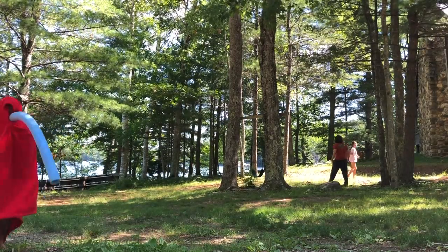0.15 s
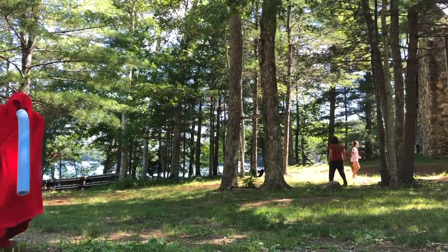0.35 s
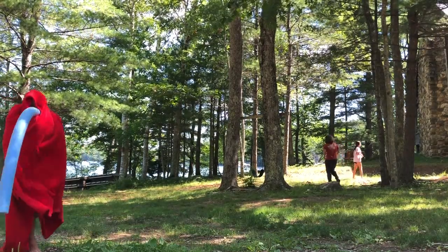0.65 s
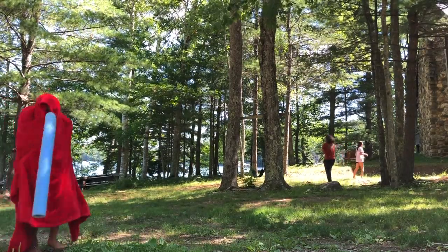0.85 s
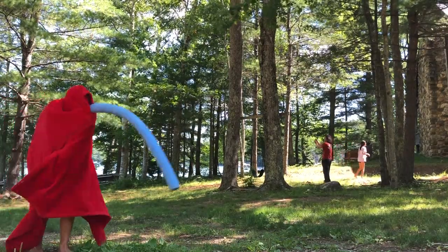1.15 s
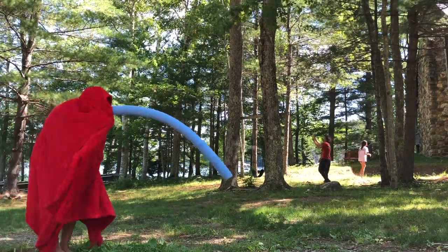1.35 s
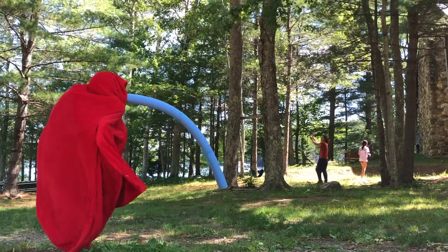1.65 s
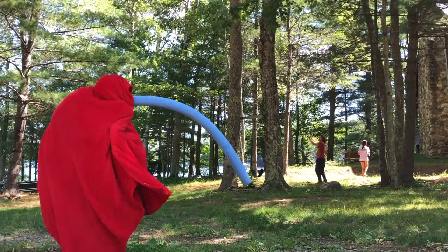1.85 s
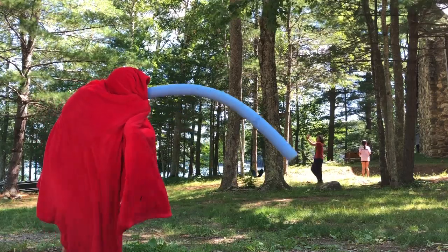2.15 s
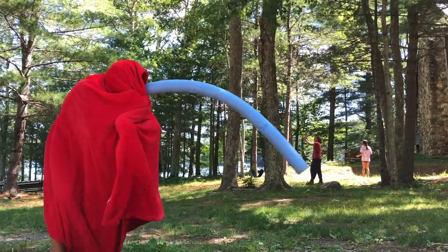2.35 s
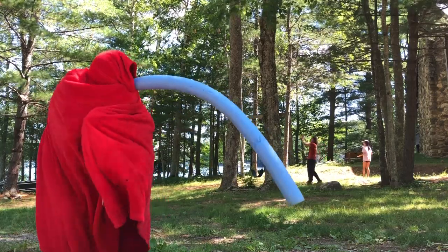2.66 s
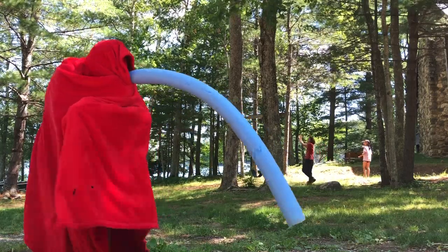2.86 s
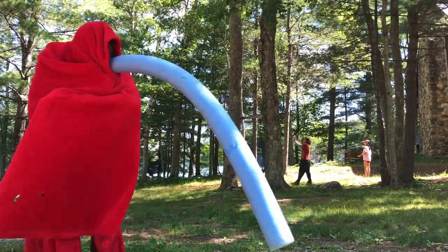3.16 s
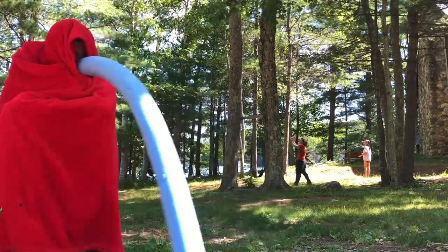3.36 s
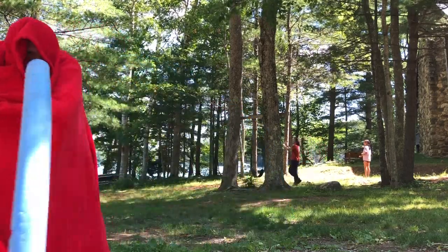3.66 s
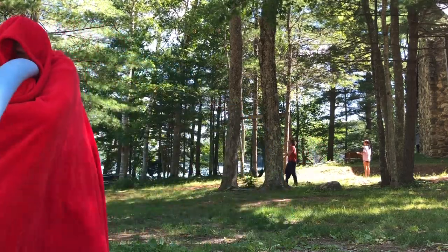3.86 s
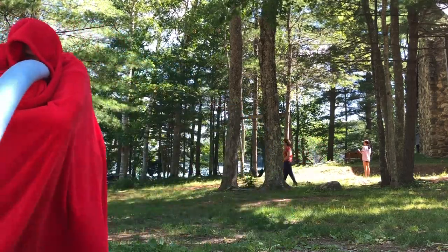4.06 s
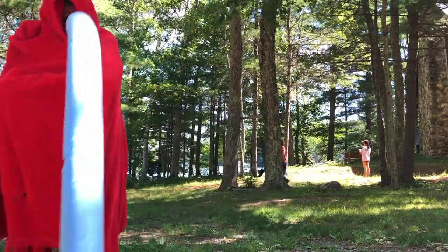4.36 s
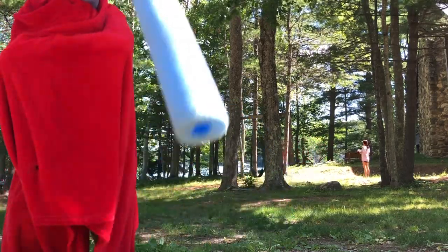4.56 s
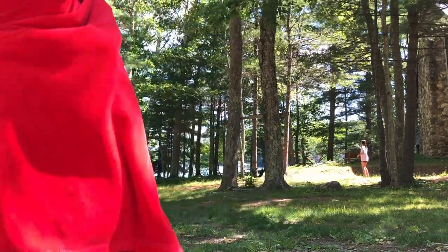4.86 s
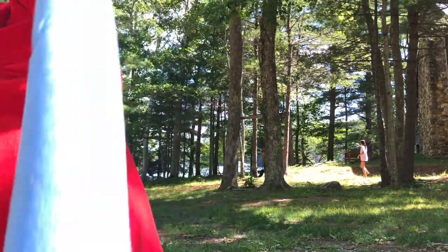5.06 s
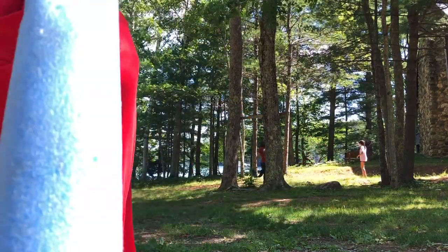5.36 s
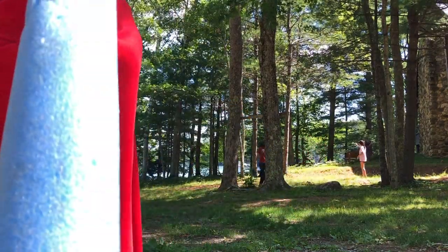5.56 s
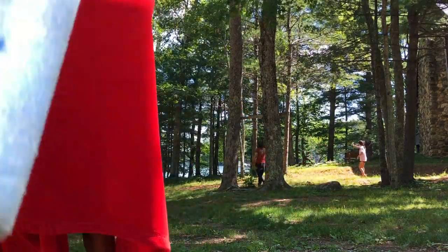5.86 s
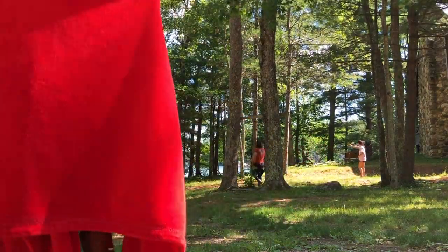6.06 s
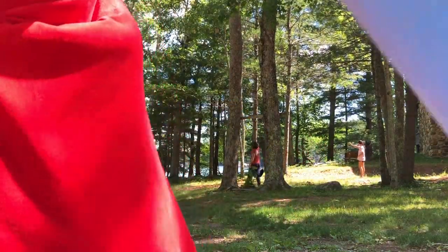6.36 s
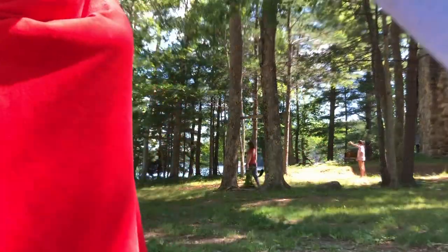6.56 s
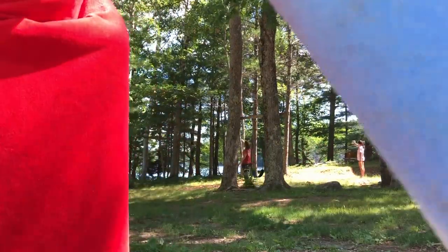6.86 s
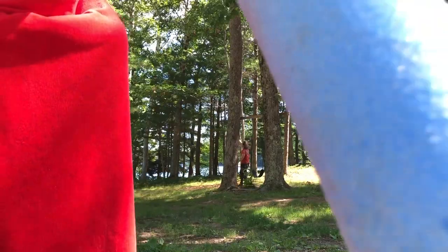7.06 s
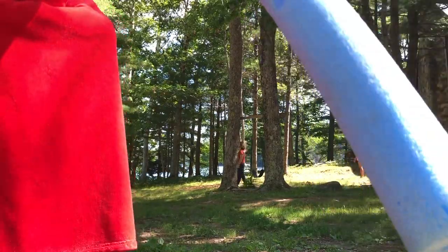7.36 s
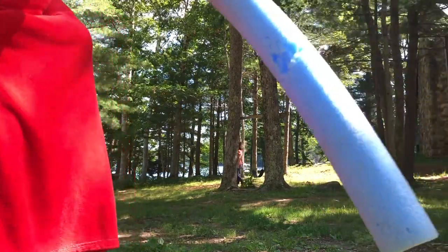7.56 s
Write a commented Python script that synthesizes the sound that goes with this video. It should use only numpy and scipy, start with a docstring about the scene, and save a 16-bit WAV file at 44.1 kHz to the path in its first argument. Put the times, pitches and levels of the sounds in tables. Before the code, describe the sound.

Wind puffs and one strong gust buffet a microphone in quiet woods, then cloth rustles and a foam tube thumps and scrapes against it.

```python
"""Wind turbulence on a phone's microphone: a frozen pattern of noise swept past faster in stronger air, with eddies.
Leaves hiss as broadband noise beneath it, and far motor hums are wavering sines.
A blanket rustles and ticks by fine friction grains; a foot drags in grass, twigs snap, an insect buzzes faintly.
A foam tube bumps the phone (thuds falling in pitch), scuffs it and drags along it (stick-slip noise)."""
import sys
import numpy as np
from scipy import signal
from scipy.fft import rfft, irfft
from scipy.io import wavfile
from scipy.ndimage import uniform_filter1d, map_coordinates

SR = 44100
rng = np.random.default_rng(int(sys.argv[2]) if len(sys.argv) > 2 else 0)


def wav_record(signal):
    """Record a signal, one row per channel, as 16-bit PCM in the file named by sys.argv[1]."""
    frames = np.transpose(np.atleast_2d(signal))
    bounded = np.clip(frames, -1, 1)
    # unit amplitude maps onto the largest positive 16-bit level
    quanta = np.round(bounded * 32767).astype(np.int16)
    wavfile.write(sys.argv[1], SR, quanta)


N = 340011
T = np.arange(N) / SR  # time in seconds

# Background breeze on the microphone, rising, falling and lulling.
# Each row: time in seconds, level in dB before flutter.
BREEZE = [(0, -64), (1.0, -64), (1.45, -59), (1.8, -53), (2.73, -55), (2.76, -70), (2.95, -61.5),
          (3.17, -75), (3.34, -75), (3.45, -60), (3.9, -68), (4.6, -60.5), (5.6, -55.5), (5.87, -68),
          (6.38, -66.5), (6.72, -55), (6.95, -60), (7.71, -61)]
# The one strong gust, added to the breeze. Each row: time in seconds, level in dB before flutter.
STRONG_GUST = [(1.8, -56), (1.84, -45), (1.895, -42), (1.938, -25), (1.975, -35), (2.066, -36),
               (2.122, -28), (2.2, -32), (2.25, -31), (2.3, -41), (2.38, -50), (2.42, -65.5)]
# Short puffs of air. Each row: start in seconds, length in seconds, level in dB before flutter.
PUFFS = [(0.049, 0.12, -47), (.35, 0.23, -47), (0.646, 0.031, -55), (0.753, 0.041, -48), (.85, 0.041, -41),
         (0.946, 0.028, -52), (1.09, 0.071, -53), (1.262, .04, -52), (1.338, 0.061, -43), (2.389, .04, -43),
         (2.451, .09, -43), (2.579, 0.12, -41.5), (2.996, .13, -48), (3.376, 0.068, -53), (3.529, .21, -44),
         (3.781, 0.0315, -52), (4.244, 0.066, -56), (4.558, 0.027, -53), (4.78, 0.067, -53),
         (5.888, 0.033, -54), (6.07, 0.058, -52.5)]
# Sudden eddies in the wind. Each row: time in seconds, envelope peak in dB, settled pitch in Hz.
EDDIES = [(0.097, -39.5, 252), (0.877, -41.5, 248), (1.361, -39, 253.5), (1.906, -30, 310),
          (1.933, -19.5, 563), (1.953, -29, 243.1), (2.015, -27, 256), (2.064, -38, 330), (2.097, -26, 380),
          (2.121, -22, 342), (2.158, -33, 362), (2.174, -29.5, 364.7), (2.194, -33.5, 299),
          (2.231, -28, 404), (2.243, -24.5, 317.5), (2.354, -41, 328), (2.403, -39.5, 249.6),
          (2.52, -38.5, 310.3), (2.611, -37.5, 311), (3.65, -44, 248.4), (3.704, -40, 257)]
# Spectrum of the turbulence pattern at unit speed. Each row: frequency in Hz, relative density in dB per Hz.
TURBULENCE = [(15, -29), (45, -7.5), (90, -3.5), (150, -4.5), (250, -11.5), (400, -25), (700, -52.5),
              (1200, -95)]
PUFF_RISE_S, PUFF_FALL_S, PUFF_GROWS_DB = .03, .012, 3  # a puff builds up, then breaks off
WAKE_DB = -5.5  # turbulence behind an eddy, relative to the eddy

# Spectrum of the leaf hiss. Each row: frequency in Hz, relative density in dB per Hz.
LEAF_SPECTRUM = [(24, -48), (40, -6), (69, -2.5), (154, -4), (208, -7.5), (267, -7.5), (474, -16),
                 (862, -16), (1960, -27), (4260, -24), (15600, -38)]
LEAVES_DB = -61.5  # mean rms level of the hiss above 500 Hz
# Far motor tones. Each row: start in seconds, end in seconds, mean pitch in Hz, mean rms level in dB.
MOTOR_TONES = [(4.4, 5.801, 81.86, -64), (6.901, 7.71, 82, -67), (4.0, 5.743, 146.1, -57),
               (5.15, 5.81, 178.3, -56), (6.7, 7.71, 146.6, -59.5), (7.38, 7.67, 177.7, -58)]
HUM_FADE_S = 0.084

# Blanket swishes. Each row: start in seconds, length in seconds, level in dB, brightness in dB per octave.
RUSTLE = [(.96, .11, -69, 7), (1.49, 0.039, -60.5, 1), (2.861, 0.042, -65, 8), (3.02, 0.48, -70.5, 0),
          (3.748, 0.14, -66.5, 6), (3.885, 0.083, -57.5, 5), (4.024, .05, -65, 5), (4.539, .22, -55, 3),
          (4.639, 0.096, -55, -2), (4.782, 0.097, -63.5, 0), (4.915, 0.083, -57.5, 5),
          (6.158, 0.044, -64.5, -2), (7.584, 0.065, -64.5, -1)]
# Blanket ticks. Each row: time in seconds, rms in dB before decay, brightness in dB per octave.
TICKS = [(1.409, -50.5, 5), (2.354, -45, 5), (3.0163, -51, 6), (3.1386, -37, 6.5), (3.1514, -47, 6),
         (3.2844, -49, -2), (3.296, -54.5, 3), (3.481, -46, 3), (4.608, -34, 5), (4.7454, -49, 2),
         (4.9807, -47.5, 0.5), (5.6016, -40, -6.5), (6.905, -38, 11)]
SWISH_RISE_S, SWISH_FALL_S = 0.039, 0.018

# A foot drags in dry grass. Each row: time in seconds, level in dB before flicker.
GRASS = [(2.85, -79), (2.9, -66), (2.942, -49.5), (3.02, -65)]
# Twigs snap underfoot. Each row: time in seconds, rms in dB before the envelope.
TWIGS = [(3.13, -38), (3.181, -48.5), (3.274, -34)]
# Far insect. Each row: start in seconds, end in seconds, upper edge of the buzz in Hz, level in dB before fades.
INSECT = [(3.027, 3.359, 7520, -74.5), (5.197, 5.496, 7740, -78)]

# Tube bumps the phone. Each row: time in seconds, amplitude in dB before the envelope, first pitch in Hz,
# time constant of the pitch fall in ms, decay time in ms.
BUMPS = [(5.0738, -19.5, 234, 29, 7.9), (5.133, -20.5, 201.6, 21, 35), (5.175, -25.5, 90, 37, 24),
         (6.4202, -24, 535, 11, 7.1), (6.424, -26, 238, 14.3, 20), (6.449, -31, 75.5, 110, 19),
         (6.604, -36, 500, 5.2, 6.3), (6.609, -31, 136.5, 36, 22)]
# Tube scuffs the phone. Each row: time in seconds, rms in dB before the envelope, length in ms,
# brightness in dB per octave, ring of the squeezed foam in Hz.
SCUFFS = [(5.071, -31.5, 4.2, -0.5, 3800), (5.089, -37, 15, 1, 4000), (5.1318, -29.5, 3.1, -0.5, 2500),
          (5.144, -35, 19.4, 0, 4400), (5.172, -36.5, 8.4, -2.5, 2700), (6.4192, -22, 3, 1.5, 4300),
          (6.435, -31.5, 3.8, 2.5, 4460), (6.442, -39.5, 9.3, -4.5, 2300), (6.53, -51.5, 30, 1.5, 4530),
          (6.599, -28.5, 5.6, 0, 3230), (6.618, -50, 6.9, 5, 3500), (6.634, -39.5, 11.2, 0, 2500),
          (6.692, -31, 10.8, 0, 3300), (6.705, -36.5, 18.3, -2.5, 3330), (6.733, -46.5, 12.4, 0, 2800),
          (6.764, -35.5, 10.4, -2, 4000), (6.82, -39.5, 40.6, -2, 3300), (6.980, -30.5, 2, -1.5, 3220),
          (7.081, -33.5, 2.6, -4, 2600), (7.25, -31, 5.6, -2, 3800), (7.347, -31.5, 4.2, -2.5, 3800)]
# Tube drags along the phone. Each row: time in seconds, level in dB before the rush is added,
# mean brightness in dB per octave.
DRAG = [(6.76, -66, 4), (6.768, -41.5, 0), (6.86, -47.5, -8), (6.925, -53.5, -7), (6.975, -40, -4.5),
        (7.08, -44, -0.5), (7.12, -40, 0.5), (7.354, -41, 4), (7.375, -44, 1.5), (7.395, -60, -4)]
# Spectrum of the long drag. Each row: frequency in Hz, relative density in dB per Hz.
DRAG_SPECTRUM = [(120, -47.5), (200, -11), (407, -16), (480, -1.5), (642, -7), (1260, 4), (2570, -2),
                 (3830, 7), (7520, -6.5), (15600, -18)]
# Spectrum of short scuffs. Each row: frequency in Hz, relative density in dB per Hz.
SCUFF_SPECTRUM = [(240, -15), (400, 1), (643, -4), (1260, 1), (2190, -8), (2800, -2), (4370, -4),
                  (5020, -4), (6030, -4.5), (15600, -12)]
# Resonances of the phone case. Each row: frequency in Hz, width in Hz, gain in dB.
CASE_RINGS = [(479.3, 32, 4), (1236, 170, 8), (3920, 700, 1.5), (7200, 1900, -0.5)]
SCUFF_RISE, SCUFF_FALL = 0.51, 0.23  # shares of the scuff length
RUSH_DB, RUSH_PER_BRIGHTNESS = -3, 1.62  # airy rush of the drag: base level, dB per unit of brightness
# The foam creeps on after a quick tap, less after a long scuff.
SETTLE_DB, SETTLE_DB_PER_MS, SETTLE_MS = -11, -0.76, 13.6
RING_WIDTH, RING_DB = 0.17, 7.5  # foam ring: width as a share of its pitch, gain

TOP_HZ = 15650  # upper limit of the phone's recording band


def undb(db):
    """Convert level to amplitude: 20 dB is a factor of ten."""
    return 10 ** (np.asarray(db) / 20)


def unit(x):
    """Normalise the mean power, so that rms is 1."""
    return x / np.sqrt(np.mean(x ** 2))


def read(table):
    """Interpolate a curve at every sample, its level as gain and zero outside its span."""
    s, db, *rest = np.array(table).T
    inside = (T >= s[0]) & (T <= s[-1])
    gain = undb(np.interp(T, s, db)) * inside
    return [gain] + [np.interp(T, s, column) for column in rest]


def colour(x, points, rings=(), tilt_db=0):
    """Filter linearly in frequency: (Hz, dB) points, resonant bumps and a tilt per octave about 4 kHz."""
    hz = np.maximum(np.fft.rfftfreq(len(x), 1 / SR), 10)
    point_hz, point_db = np.array(points).T
    db = np.interp(np.log(hz), np.log(point_hz), point_db)
    db = db + sum(peak / (1 + (2 * (hz - centre) / width) ** 2) for centre, width, peak in rings)
    return irfft(rfft(x) * undb(db + tilt_db * np.log2(hz / 4000)), len(x))


def tilted(x, points, rings, tilt_db):
    """Cross-fade colourings of -6 and +6 dB per octave by square-root gains, so brightness can move in time."""
    dull = unit(colour(x, points, rings, -6))
    bright = unit(colour(x, points, rings, 6))
    share = np.clip(.5 + tilt_db / 12, 0, 1)
    return np.sqrt(1 - share) * dull + np.sqrt(share) * bright


def walk(rate):
    """Slow random modulation: levels drawn rate times a second, joined by ramps; rms 1."""
    k = int(SR / rate)
    steps = np.repeat(rng.standard_normal(N // k + 1), k)
    return unit(uniform_filter1d(steps, k)[:N])


def grains(n, spread_db):
    """Friction noise as dense one-sample slips with a long tail of sizes."""
    return unit(rng.standard_normal(n) * undb(spread_db * rng.exponential(size=n)))


def swell(start, length, rise, fall):
    """Envelope of growth and relaxation: smooth rise, hold to the end of length, exponential fall."""
    up = np.sin(np.pi / 2 * np.clip((T - start) / rise, 0, 1)) ** 2
    return up * np.exp(-np.maximum(T - start - length, 0) / fall)


def add(out, s, x):
    """Superpose x on out from time s."""
    i = int(s * SR)
    out[i:i + len(x)] += x[:N - i]


def gusts():
    """Frozen turbulence swept past the microphone port: faster air is louder and higher in pitch."""
    air = read(BREEZE)[0] + read(STRONG_GUST)[0] + 1e-6
    swirls = np.zeros(N)
    for s, length, db in PUFFS:
        growth_db = PUFF_GROWS_DB * np.clip((T - s) / length - 1, -1, 0)
        air = air + undb(db + growth_db) * swell(s, length, min(PUFF_RISE_S, length), PUFF_FALL_S)
    t = np.arange(SR // 10) / SR
    taper = np.cos(np.pi / 2 * t / t[-1]) ** 2
    phases = rng.random((len(EDDIES), 1))  # in turns
    for (s, peak_db, hz), phase in zip(EDDIES, phases):
        turns = hz * (t + 0.0025 * (1 - np.exp(-t / 0.0028)))  # the swirl starts fast and slows as it passes
        shape = turns ** 2 * np.exp(2 - 2 * turns)  # strongest after one turn
        add(swirls, s - .001, undb(peak_db) * np.sin(2 * np.pi * (turns + phase)) * shape)
        wake = (1 - np.exp(-t / 0.00298)) * np.exp(-t / 0.015) * taper
        add(air, s, undb(peak_db + WAKE_DB) * wake)
    # octaves of speed follow the air level, with a random part
    octaves = .045 * (20 * np.log10(air) + 47) + .2 * walk(50)
    speed = 2 ** np.clip(octaves, -1.2, 2)
    pattern = unit(colour(rng.standard_normal(4 * N), TURBULENCE))
    swept = map_coordinates(pattern, [np.cumsum(speed)], order=1)
    flutter = undb(3.33 * walk(60) + 0.81 * walk(23.69))
    return swept * air * flutter + swirls


def woods():
    """Superposed distant sources: gently swelling broadband leaf hiss and frequency-modulated motor tones."""
    hiss = colour(rng.standard_normal(N), LEAF_SPECTRUM)
    above = signal.sosfilt(signal.butter(2, 500, "high", fs=SR, output="sos"), hiss)
    out = hiss / np.std(above) * undb(LEAVES_DB + .5 * walk(2.1))
    for start, end, hz, db in MOTOR_TONES:
        wavering_hz = hz * (1 + 0.0041 * walk(5.07))
        tone = np.sqrt(2) * np.sin(2 * np.pi * np.cumsum(wavering_hz) / SR)
        level = undb(db + 0.48 * walk(6.5))
        out = out + level * swell(start, end - start, HUM_FADE_S, HUM_FADE_S / 2) * tone
    return out


def blanket():
    """Dry friction: fleece fibres slip in fine grains, and now and then a fold ticks as a decaying impulse."""
    swishes = np.array([undb(db) * swell(s, length, SWISH_RISE_S, SWISH_FALL_S)
                        for s, length, db, _ in RUSTLE])
    gain = swishes.sum(axis=0)
    tilt_db = np.array(RUSTLE)[swishes.argmax(axis=0), -1]  # the loudest swish sets the brightness
    fleece = [(150, -43), (600, -3.0), (3000, 2), (9000, -2.5), (15000, -8.0)]
    slips = grains(N, 2.4) * undb(2.0 * walk(70) + 1.2 * walk(250))
    out = tilted(slips, fleece, (), tilt_db) * gain
    t = np.arange(SR // 25) / SR
    for s, rms_db, tick_tilt_db in TICKS:
        tick = unit(colour(rng.standard_normal(len(t)), fleece, (), tick_tilt_db))
        add(out, s, undb(rms_db) * tick * np.exp(-t / .0012))
    return out


def feet():
    """Friction and fracture: a foot drags through dry grass, and small twigs give in short decaying bursts."""
    blades = colour(grains(N, 4.1), [(300, -2), (800, 0), (1500, -2.0), (3500, -22), (9000, -35)])
    out = unit(blades) * read(GRASS)[0] * undb(2.8 * walk(90))
    t = np.arange(SR // 25) / SR
    snap = (1 - np.exp(-t / 0.00055)) * np.exp(-t / 0.0045)
    wood = [(150, -20), (350, 6.5), (1200, -13.0), (2500, -29.5), (8000, -33)]
    for s, rms_db in TWIGS:
        crack = unit(colour(rng.standard_normal(len(t)), wood))
        add(out, s, undb(rms_db) * crack * snap)
    return out


def insect():
    """Narrow-band noise: a faint buzz whose spectrum climbs to one pitch and drops steeply above it."""
    out = np.zeros(N)
    for start, end, hz, db in INSECT:
        n = int((end - start) * SR)
        buzz = colour(grains(n, 3.5), [(0.77 * hz, -40), (hz, 0), (1.0 * hz, -40)])
        add(out, start, undb(db) * unit(buzz) * np.hanning(n) ** 0.26)
    return out


def tube():
    """Stick-slip of foam cells on a resonant case; each bump pushes air at the port, a thud that sags in pitch."""
    gain, tilt_db = read(DRAG)
    slips = grains(N, 1.64) * undb(1.0 * walk(90) + 1.67 * walk(300))
    rush = unit(colour(slips, [(4500, -17), (6500, -4.5), (8000, -1.5), (10000, -7.0), (13000, -17)]))
    rush_db = RUSH_DB + RUSH_PER_BRIGHTNESS * tilt_db + 0.71 * walk(30)
    scrape = tilted(slips, DRAG_SPECTRUM, CASE_RINGS, tilt_db + 2.4 * walk(40))
    out = gain * (scrape + undb(rush_db) * rush)
    t = np.arange(SR // 5) / SR
    ms = 1000 * t
    for s, rms_db, length, scuff_tilt_db, ring_hz in SCUFFS:
        rings = CASE_RINGS + [(ring_hz, RING_WIDTH * ring_hz, RING_DB)]
        after = np.maximum(ms - length, 0)
        release = np.exp(-after / (SCUFF_FALL * length))
        creep = undb(SETTLE_DB + SETTLE_DB_PER_MS * length) * np.exp(-(after / SETTLE_MS) ** 2)
        shape = np.clip(ms / (SCUFF_RISE * length), 0, 1) ** 2 * np.maximum(release, creep)
        scuff = unit(colour(grains(len(t), 2.46), SCUFF_SPECTRUM, rings, scuff_tilt_db))
        add(out, s, undb(rms_db) * scuff * shape)
    for s, peak_db, first_hz, sag, length in BUMPS:
        hz = np.maximum(first_hz * np.exp(-ms / sag), 50)
        fade = (1 - np.exp(-ms / 0.52)) * np.exp(-(ms / length) ** 1.08)
        thud = -np.sin(2 * np.pi * np.cumsum(hz) / SR)
        add(out, s, undb(peak_db) * thud * fade)
    return out


def scene():
    """Linear superposition: all sources add at one microphone in the open air."""
    return (gusts() + woods() + blanket() + feet() + insect() + tube())[None]


def record(dry):
    """Band limiting: the phone drops the deepest bass and cuts the top."""
    dry = signal.sosfilt(signal.butter(2, 38, "high", fs=SR, output="sos"), dry)
    return signal.sosfilt(signal.ellip(10, .2, 80, TOP_HZ, fs=SR, output="sos"), dry)


dry = scene()
out = record(dry)
wav_record(out)
```